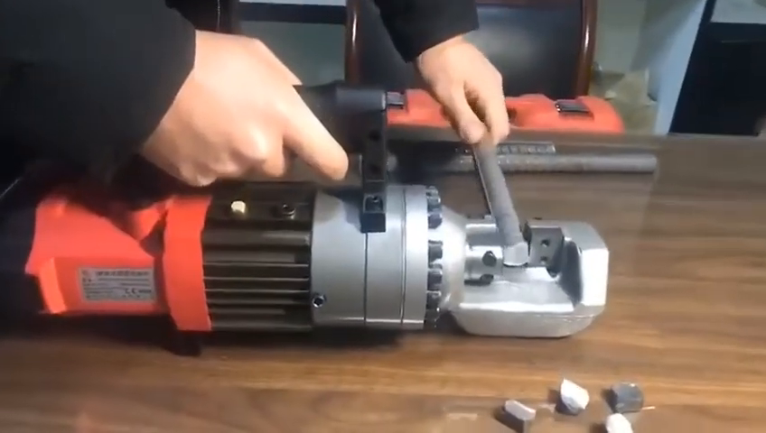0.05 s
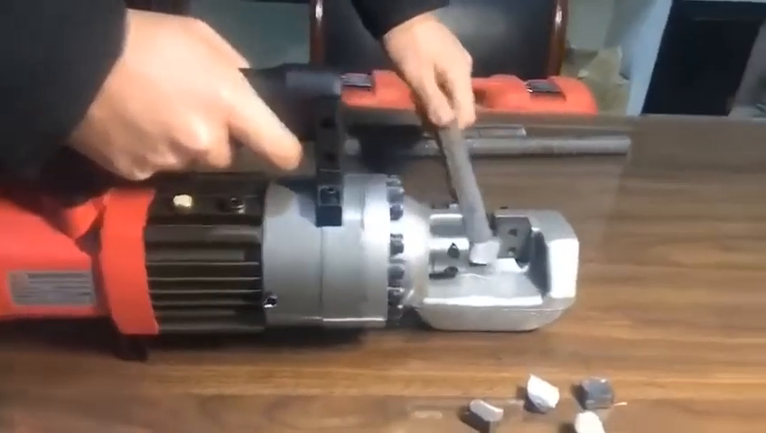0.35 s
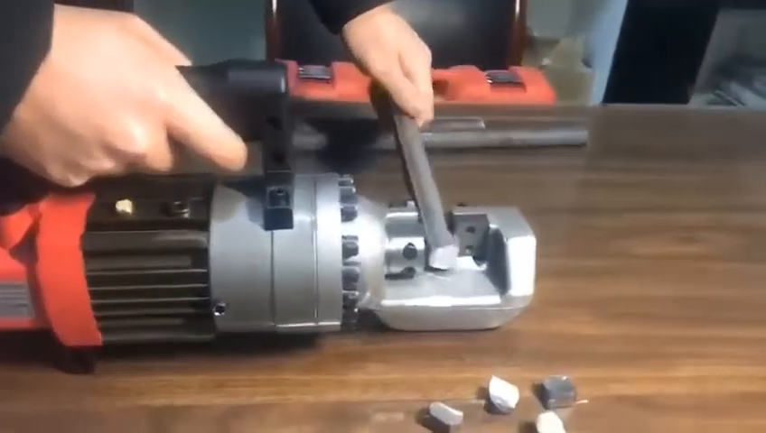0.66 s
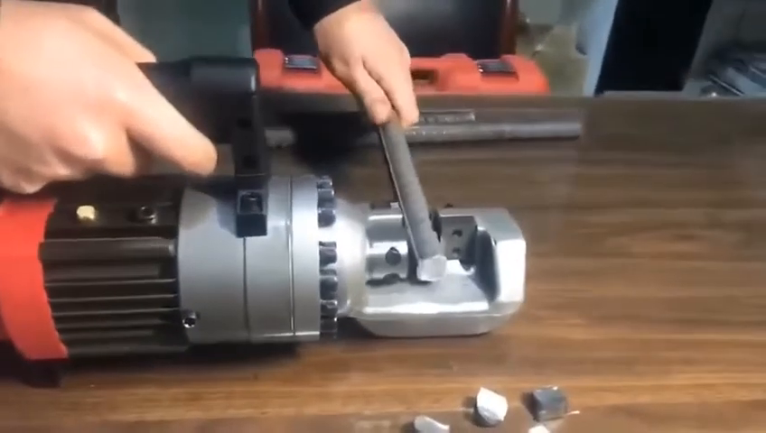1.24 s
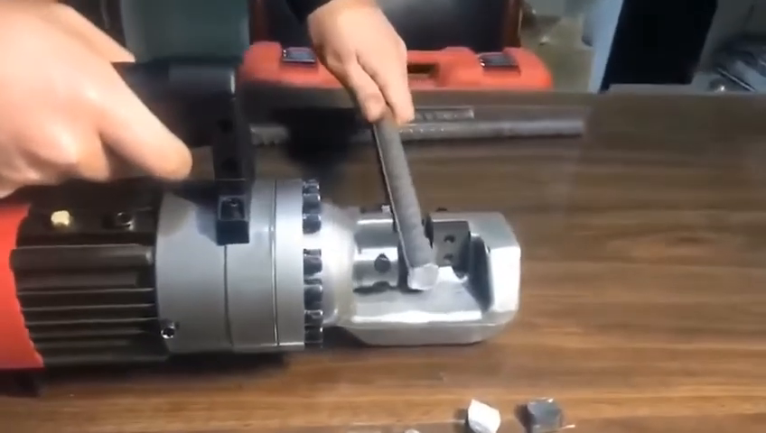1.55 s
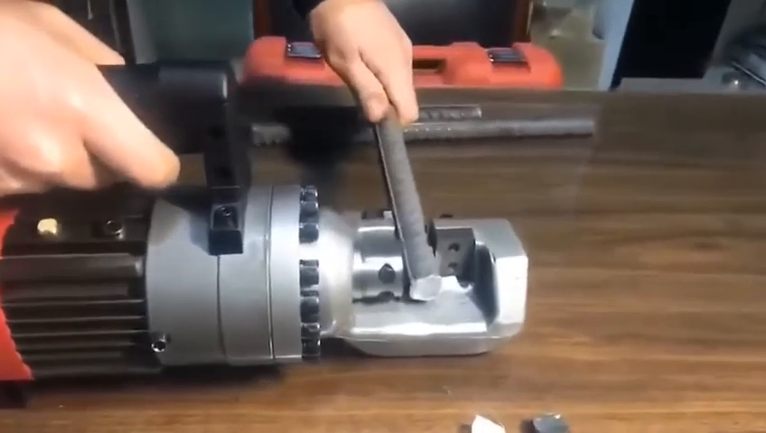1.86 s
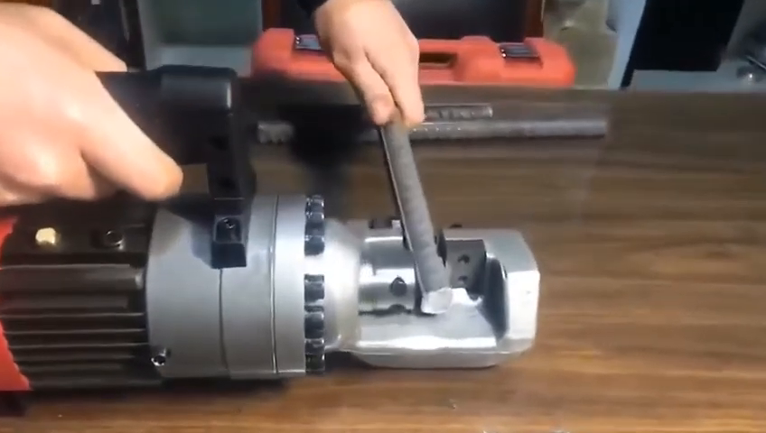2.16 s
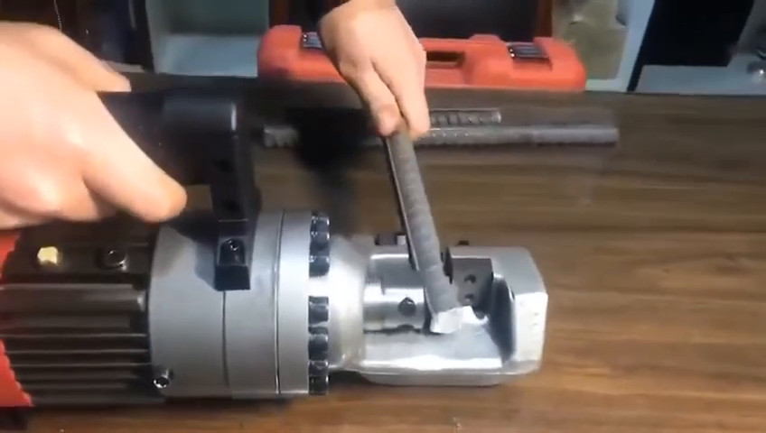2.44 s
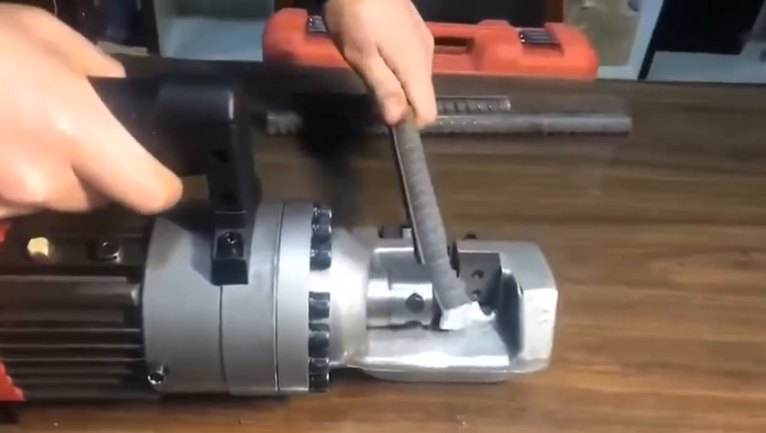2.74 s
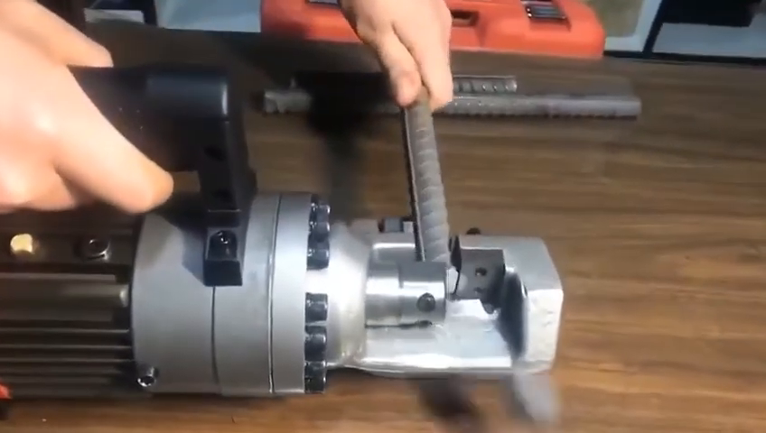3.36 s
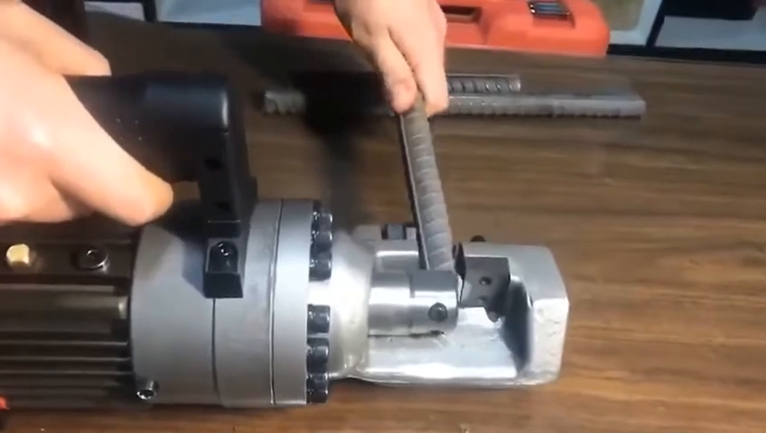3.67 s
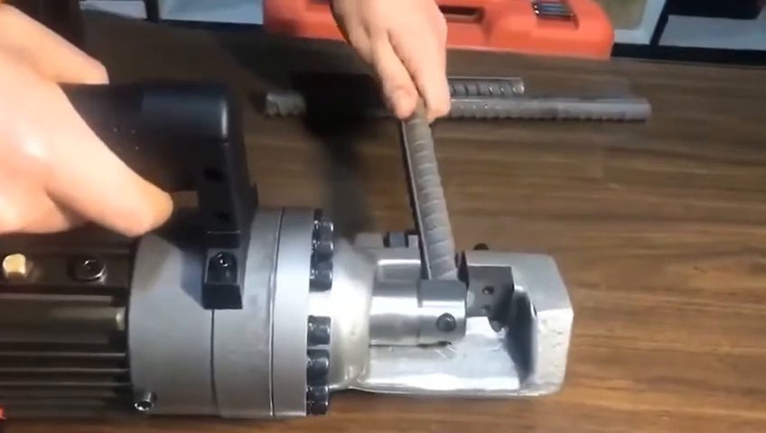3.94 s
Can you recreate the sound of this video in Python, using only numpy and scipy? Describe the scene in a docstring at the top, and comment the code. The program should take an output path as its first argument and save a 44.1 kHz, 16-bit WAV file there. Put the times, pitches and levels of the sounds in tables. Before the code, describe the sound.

Electric cutter motor spins up, labours and cracks through a steel bar indoors.

```python
"""A few handling clicks and a soft shuffle: an electric rebar cutter on a wooden table in a small room.
The motor spins up with a scratch of brushes, then sinks in pitch as its whining hydraulic pump forces
the blade into the steel. The bar snaps with a ringing crack and the motor races free.
It idles with a hum and a rush of fan air, then starts to coast down."""
import sys
import numpy as np
from scipy import signal
from scipy.fft import rfft, irfft
from scipy.io import wavfile
from scipy.ndimage import uniform_filter1d

SR = 44100
rng = np.random.default_rng(int(sys.argv[2]) if len(sys.argv) > 2 else 0)


def wav_record(signal):
    """Record a signal, one row per channel, as 16-bit PCM in the file named by sys.argv[1]."""
    frames = np.transpose(np.atleast_2d(signal))
    bounded = np.clip(frames, -1, 1)
    # unit amplitude maps onto the largest positive 16-bit level
    quanta = np.round(bounded * 32767).astype(np.int16)
    wavfile.write(sys.argv[1], SR, quanta)


N = 176400
TIME = np.arange(N) / SR
MOTOR_ON_S, DRONE_HZ = 1.15, 99.95


def from_db(db):
    """Decibels to gain."""
    return 10 ** (np.asarray(db) / 20)

def unit_rms(x):
    """Scale to rms 1."""
    return x / np.sqrt(np.mean(np.abs(x) ** 2) + 1e-20)

def curve(rows):
    """Breakpoints joined into an envelope."""
    return np.interp(TIME, *np.transpose(rows))

def eq_gain(colour, hz):
    """Gain of an EQ curve at these frequencies."""
    freqs, db = np.transpose(colour)
    return from_db(np.interp(np.log(hz + 1e-9), np.log(freqs), db))

def noise(colour):
    """Noise through an EQ curve, rms 1."""
    gain = eq_gain(colour, np.arange(N // 2 + 1) * SR / N)
    return unit_rms(irfft(rfft(rng.standard_normal(N)) * gain, N))

def drift(rate_hz):
    """A smooth random modulator, rms about 1."""
    pole = np.exp(-2 * np.pi * rate_hz * 20 / SR)  # one step per 20 samples
    slow = signal.lfilter([1], [1, -2 * pole, pole * pole], rng.standard_normal(N // 20 + 2002))[2000:]
    return np.interp(np.arange(N) / 20, np.arange(len(slow)), unit_rms(slow))

def tone(angle, rough, rate_hz):
    """A sine of rms about 1 whose level and phase flutter."""
    flutter = unit_rms(1 + rough * (drift(rate_hz) + 1j * drift(rate_hz)))
    return np.sqrt(2) * np.real(flutter * np.exp(1j * (angle + 2 * np.pi * rng.random())))

def ring(click, hz, t60_s):
    """A click sets one mode ringing."""
    r, w = np.exp(-np.log(1000) / (t60_s * SR)), 2 * np.pi * hz / SR
    return signal.lfilter([0, np.sin(w)], [1, -2 * r * np.cos(w), r * r], click + 1e-18)

def struck(modes):
    """A struck body's modes ring together, alternating in polarity."""
    click = signal.unit_impulse(SR)
    return sum((-1) ** k * from_db(db) * ring(click, hz, t60) for k, (hz, db, t60) in enumerate(modes))

def burst(t60_s):
    """Noise that dies away."""
    return rng.standard_normal(SR) * np.exp(-np.log(1000) * TIME[:SR] / t60_s)

def in_room(dry, wet_db):
    """Direct sound plus a short diffuse tail."""
    tail = burst(t60_s=0.35) * (TIME[:SR] > 0.005)
    return dry + from_db(wet_db) * signal.fftconvolve(dry, tail / np.linalg.norm(tail))[:N]


# dark room air: freq_hz, relative_db
ROOM_EQ = [(25,-17),(70,-5),(130,-15),(250,-25.5),(900,-38.5),(2400,-35),(7500,-49.5)]

def room_tone():
    """A faint bed that ducks as the motor starts."""
    duck = np.clip((TIME - MOTOR_ON_S) / 0.5, 0, 1)
    return from_db(-44 - 13.5 * duck) * noise(ROOM_EQ)

# modes of bar and jaws: pitch_hz, relative_db, t60_s
STEEL_MODES = [(1360,-10.5,0.014),(1510,-7.5,0.0098),(1676,-22,0.6),(1778,6,0.019),(2890,-9.5,0.013),(3570,-20.5,0.036)]
# modes of the table top: pitch_hz, relative_db, t60_s
TABLE_MODES = [(95,1,0.06),(204,-5,0.058)]

def impact(start_s, ring_db, crack_db, thump_db):
    """A contact cracks, rings the steel and thumps the table."""
    crack = signal.lfilter(*signal.butter(1, 4000, fs=SR), burst(t60_s=0.058))
    body = from_db(ring_db) * struck(STEEL_MODES) + from_db(thump_db) * struck(TABLE_MODES)
    return np.pad(body + from_db(crack_db) * crack, (int(start_s * SR), N))[:N]

# hits: start_s, ring_db, crack_db, thump_db
KNOCKS = [(0.151,-24,-39,-27.5),(0.17,-36,-43,-23),(0.687,-49,-48,-60),(0.707,-58,-53,-41),(1.007,-50,-33.5,-40.5),(1.153,-40,-23.5,-50.5),(2.944,-30,-20,-24.5)]

def knocks():
    """Steel and switch click in handling; one more knock follows the snap."""
    return sum(impact(*row) for row in KNOCKS)

# shuffle envelope: time_s, level_db
SHUFFLE_LEVEL = [(.27,-56),(.35,-39.5),(.44,-45.5),(.5,-62)]
# its dull colour: freq_hz, relative_db
SHUFFLE_EQ = [(30,-21.5),(110,7.5),(500,-8),(4000,-45)]

def shuffle():
    """The tool shifts on the wood."""
    return from_db(curve(SHUFFLE_LEVEL)) * noise(SHUFFLE_EQ)

# hum envelope: time_s, level_db
HUM_LEVEL = [(1.16,-34),(1.21,-13.5),(1.25,-20.5),(1.32,-20),(1.365,-29),(1.45,-14),(1.61,-28.5),(2.0,-21.5),(2.25,-20),(2.36,-27.5),(2.6,-25.5),(2.73,-21.5),(2.9,-35),(3.01,-19),(3.4,-17),(3.7,-19.5),(3.765,-17.5),(3.81,-30.5),(3.93,-25),(4,-20)]
# drone envelope: time_s, level_db
DRONE_LEVEL = [(1.5,-41),(2.8,-45.5),(3.66,-75),(3.74,-34.5)]
# rumble of the running tool: freq_hz, relative_db
RUMBLE_EQ = [(40,-35.5),(150,10.5),(270,20),(600,-14)]

def motor_hum(angle):
    """The low end: a hum at the shaft rate over a fixed-pitch drone and rumble."""
    hum = from_db(curve(HUM_LEVEL)) * tone(angle, rough=0.11, rate_hz=15)
    drone = from_db(curve(DRONE_LEVEL)) * tone(2 * np.pi * DRONE_HZ * TIME, rough=0.7, rate_hz=6.6)
    return hum + drone + from_db(-48) * noise(RUMBLE_EQ)

# brush scratch: freq_hz, relative_db
SCRATCH_EQ = [(40,-9.5),(200,4.5),(450,-4.5),(2000,1.5),(7500,-5)]

def start_up(angle):
    """Brushes scratch under the starting current, and one harmonic squeals as it sweeps up."""
    attack = np.clip((TIME - MOTOR_ON_S) / 0.038, 0, 1)
    release = 0.5 * (1 - np.tanh((TIME - 1.48) / 0.116))
    scratch = from_db(-19.5) * attack * release * noise(SCRATCH_EQ)
    flare = 1 / (1 + ((TIME - 1.246) / 0.019) ** 2)
    return scratch + from_db(-15.5) * flare * tone(12 * angle, rough=1, rate_hz=130)

def singing(resonances, speed, angle):
    """Shaft harmonics, each swelling as it crosses its resonance."""
    sound = 0
    for harmonic, centre_hz, width_hz, db in resonances:
        detune = 2 * (harmonic * speed - centre_hz) / width_hz
        sound += from_db(db) / (1 + detune ** 2) * tone(harmonic * angle, rough=0.25, rate_hz=8)
    return sound

# pump effort, the whine's fader: time_s, gain_db
PUMP_EFFORT = [(1.15,-25.5),(1.19,-31),(1.25,-20.5),(1.35,-21),(1.45,-15),(1.57,-14),(1.8,-17.5),(2.73,-19.5),(2.81,-21),(2.87,-31),(3.2,-40)]
# blend from clean harmonics to rasp: time_s, power_share
RASP_BLEND = [(1.46,0.08),(1.8,0.22),(2.7,0.28)]
# colour of the loaded housing: freq_hz, relative_db
HOUSING_EQ = [(290,-11),(480,-12),(600,-16),(870,-23),(1050,-8.5),(1300,-14.5),(1650,-5.5),(2050,-3.5),(2450,4.5),(2850,3.5),(3200,-5),(4120,3.5),(4400,-9),(7500,-15)]
# peaks that sing out: harmonic, centre_hz, width_hz, relative_db
PUMP_RESONANCES = [(16,4170,150,-5),(9,2300,220,-4)]

def pump(speed, angle):
    """One stroke a turn shakes the housing: a stack of harmonics and a rasp pulsing with the strokes."""
    stack, power = 0, 0
    for harmonic in range(2, 36):
        gain = eq_gain(HOUSING_EQ, harmonic * speed) * from_db(2.5 * drift(3.4))
        stack += gain * tone(harmonic * angle, rough=0.28, rate_hz=14.7)
        power += gain ** 2
    strokes = unit_rms(np.exp(0.42 * np.cos(angle)))
    rasp = strokes * signal.lfilter(*signal.butter(2, 1310, "high", fs=SR), noise(HOUSING_EQ))
    share = curve(RASP_BLEND)
    whine = from_db(1.2) * (np.sqrt((1 - share) / power) * stack + np.sqrt(share) * rasp)
    throb = unit_rms(1 + 0.26 * np.cos(2 * np.pi * DRONE_HZ * TIME))
    return from_db(curve(PUMP_EFFORT)) * throb * (whine + singing(PUMP_RESONANCES, speed, angle))

# gear fader: time_s, gain_db
GEAR_LEVEL = [(1.7,-46),(1.95,-33),(2.2,-28),(2.66,-33),(2.75,-54),(2.98,-35),(3.7,-47)]

def gear(angle):
    """The gear whines at seven cycles a turn."""
    return from_db(curve(GEAR_LEVEL)) * tone(7 * angle, rough=0.2, rate_hz=14)

# hiss of air and brushes: freq_hz, relative_db
HISS_EQ = [(800,-18.5),(1600,0.5),(2400,4),(3060,-0.5),(3600,3),(5450,-2.5),(7300,7),(9000,-61.5)]
# low rush of air: freq_hz, relative_db
RUSH_EQ = [(150,-19.5),(450,0),(1300,2.5),(3000,-26.5)]
# fan and motor tones near free speed: harmonic, centre_hz, width_hz, relative_db
FAN_RESONANCES = [(4,1120,140,-40),(6,1690,74,-35.5),(9,2500,170,-29),(12,3430,380,-34),(13,3660,220,-36)]

def fan(speed, angle):
    """Cooling air hisses, rushes, whistles and sings, growing with speed."""
    octaves = np.log2(speed / 292)  # 0 near free speed, negative below
    hiss = noise(HISS_EQ) * from_db(-26 + 6 * octaves + 1.7 * drift(40))
    rush = noise(RUSH_EQ) * from_db(-35 + 14 * octaves)
    whistle = tone(25.35 * angle, rough=1.2, rate_hz=26) * from_db(-30 + 60 * octaves)
    return hiss + rush + whistle + singing(FAN_RESONANCES, speed, angle)

# spin up, labour, race free, coast: time_s, speed_hz
SHAFT_SPEED = [(1.15,74.4),(1.255,207),(1.36,248),(1.48,261.5),(1.54,262),(1.6,238),(1.69,210),(1.76,187.4),(1.9,168.3),(2.11,150.5),(2.25,149),(2.46,144.5),(2.6,146),(2.7,152),(2.76,174),(2.83,212),(2.9,236),(3.01,266),(3.12,276.4),(3.3,283),(3.5,284),(3.74,289.6),(4,159)]

def motor():
    """One slightly wobbling shaft sets the pitch of hum, pump, gear and fan."""
    speed = uniform_filter1d(curve(SHAFT_SPEED), size=1100) * (1 + 0.0021 * drift(11.4))
    angle = 2 * np.pi * np.cumsum(speed) / SR
    fade_in = np.clip((TIME - MOTOR_ON_S) / 0.022, 0, 1)
    low_end = fade_in * motor_hum(angle)
    whirr = fade_in * (pump(speed, angle) + gear(angle) + fan(speed, angle) + start_up(angle))
    return low_end + from_db(0.23) * in_room(whirr, wet_db=-9.5)

def bar_snap():
    """The steel gives way with a hard crack."""
    return impact(start_s=2.8255, ring_db=-10, crack_db=-8, thump_db=-23.5)

def pop():
    """A soft pop in the idle hum."""
    click = signal.unit_impulse(N, int(3.539 * SR))
    return from_db(-4) * ring(click, hz=280, t60_s=0.012)

def scene():
    """Knocks, motor and the breaking bar in the room, in mono."""
    hits = knocks() + bar_snap()
    return (motor() + in_room(hits, wet_db=-6.5) + pop() + room_tone() + shuffle())[None]

def record(dry):
    """Soft clipping rounds the peaks and a steep low-pass cuts the top."""
    low_pass = signal.firwin(601, 7660, fs=SR, window="blackman")
    return signal.fftconvolve(np.tanh(dry), low_pass[None], mode="same")


dry = scene()
out = record(dry)
wav_record(out)
```